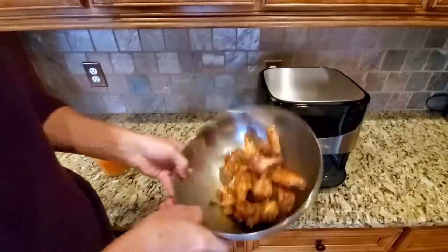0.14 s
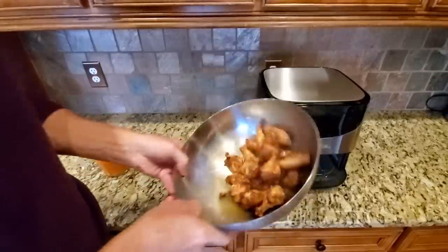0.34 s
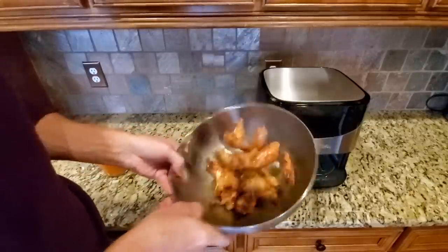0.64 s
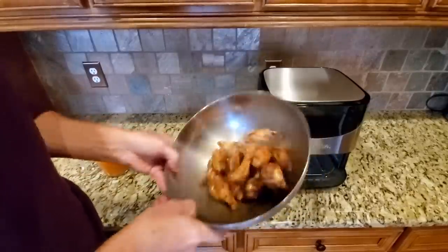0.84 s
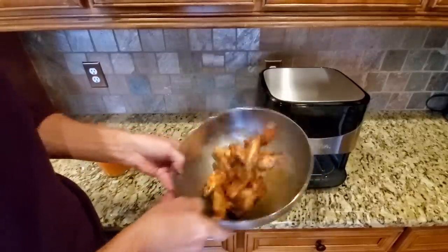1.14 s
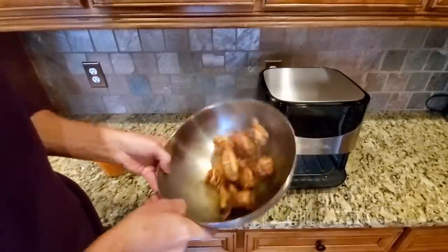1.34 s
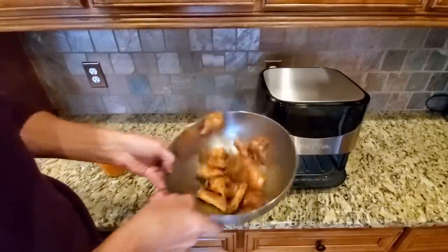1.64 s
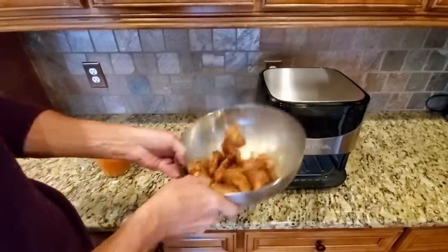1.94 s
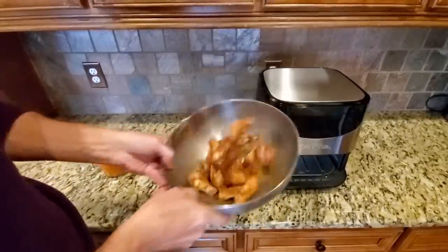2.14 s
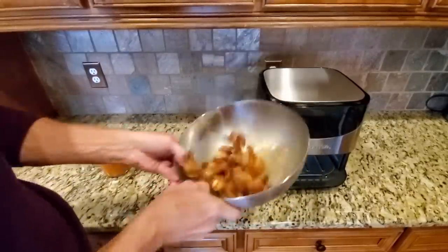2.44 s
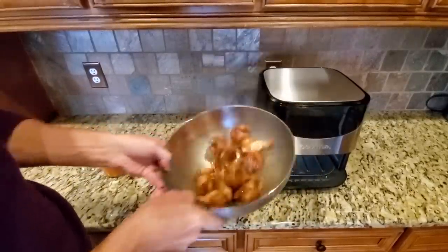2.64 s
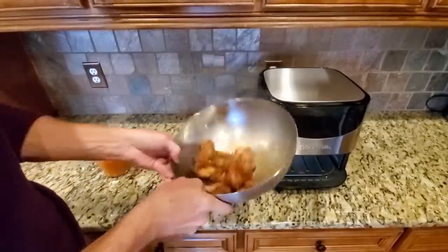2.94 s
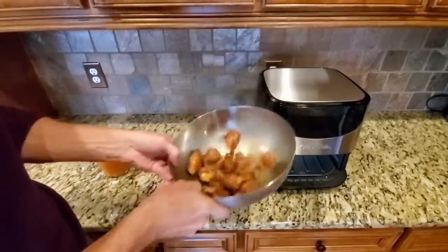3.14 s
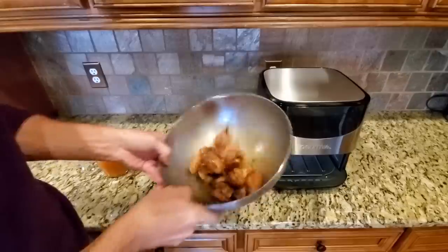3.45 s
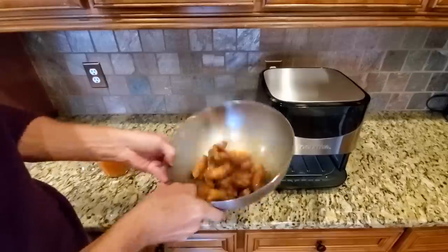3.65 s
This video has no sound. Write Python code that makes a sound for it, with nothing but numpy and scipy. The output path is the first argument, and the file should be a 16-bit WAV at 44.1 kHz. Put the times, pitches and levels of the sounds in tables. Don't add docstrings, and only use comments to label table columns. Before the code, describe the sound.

Crisp chicken wings tossed in a hand-held steel bowl, landing about four times a second with hollow thuds, crusty clicks and a fine rattle; small tiled kitchen, faint appliance hum, close stereo microphone.

```python
import sys
import numpy as np
from scipy import signal
from scipy.fft import rfft, irfft, next_fast_len
from scipy.io import wavfile
from scipy.ndimage import uniform_filter1d, map_coordinates

SR = 44100
rng = np.random.default_rng(int(sys.argv[2]) if len(sys.argv) > 2 else 0)


def volts_from_decibels(level):
    exponent = np.asarray(level, float) / 20
    return 10 ** exponent


def master_out(mix):
    frames = np.transpose(np.atleast_2d(mix))
    ceiling = np.clip(frames, -1, 1)
    pcm = np.round(ceiling * 32767).astype(np.int16)
    wavfile.write(sys.argv[1], SR, pcm)


N = 167580


def unit(x):
    return x / np.sqrt(np.mean(x ** 2) + 1e-20)


def along(points, hz):
    f, value = np.transpose(points)
    return np.interp(np.log(hz + 1), np.log(f + 1), value)


def filtered(x, response):
    m = next_fast_len(N + SR // 2)
    return irfft(rfft(x, m) * response(np.fft.rfftfreq(m, 1 / SR)), m)[..., :N]


def causal(x, spectrum):
    level_db = np.maximum(along(spectrum, np.fft.rfftfreq(4096, 1 / SR)), -60)
    cepstrum = irfft(np.log(volts_from_decibels(level_db)))
    cepstrum[1:2048] *= 2
    cepstrum[2049:] = 0
    h = irfft(np.exp(rfft(cepstrum)))
    return signal.fftconvolve(x, h[None] / np.linalg.norm(h), axes=1)[:, :N]


def add(track, s, sound):
    i = max(round(s * SR), 0)
    track[..., i:i + sound.shape[-1]] += sound


def pair(count, alike):
    a, b = rng.standard_normal((2, count))
    half_angle = np.arccos(np.clip(alike, -1, 1)) / 2
    common, opposed = np.cos(half_angle) * a, np.sin(half_angle) * b
    return np.array([common + opposed, common - opposed])


# frequency in Hz, level in dB rms.
HUM_LINES = [(120, -53.5), (181, -71), (240, -56)]
# frequency in Hz, level in dB.
AIR_SPECTRUM = [(25, -9.5), (120, -3), (330, -16.5), (520, -10.5), (900, -18), (4000, -29), (5900, -21.5),
                (9000, -32.5)]
AIR_DB = -47.5


def hum():
    t = np.arange(N) / SR
    knots = rng.standard_normal((len(HUM_LINES), 40))
    line_index = np.arange(len(HUM_LINES))[:, None]
    sway = map_coordinates(knots, [*np.broadcast_arrays(line_index, t * 8)])
    lines = np.zeros(N)
    for (hz, db), w in zip(HUM_LINES, sway):
        lines += np.sqrt(2) * volts_from_decibels(db + 1.1 * w) * np.sin(2 * np.pi * hz * t + 0.45 * w)

    def apart(hz):
        return np.clip(hz / 1500, .2, .9)

    common, own = rng.standard_normal(N), rng.standard_normal((2, N))
    shared_air = filtered(common, lambda hz: volts_from_decibels(along(AIR_SPECTRUM, hz)) * np.sqrt(1 - apart(hz) ** 2))
    own_air = filtered(own, lambda hz: volts_from_decibels(along(AIR_SPECTRUM, hz)) * apart(hz))
    return lines + volts_from_decibels(AIR_DB) * unit(shared_air + own_air)


# frequency in Hz, t60 in seconds.
ROOM_DECAY = [(200, 0.34), (6000, 0.28), (14000, 0.17)]
ROOM_DB, WALL_S = -8, 0.0046


def kitchen(x):
    hz, t, z = signal.stft(rng.standard_normal((2, SR // 2)), SR, nperseg=256)
    z[1] = np.where(hz[:, None] < 450, z[0], z[1])
    decay = volts_from_decibels(-60 * t / along(ROOM_DECAY, hz)[:, None])
    tail = signal.istft(z * decay, SR, nperseg=256)[1]
    delayed = np.pad(x, (round(WALL_S * SR), 0))
    return signal.fftconvolve(delayed[None], tail / np.linalg.norm(tail[0]), axes=1)[:, :N]


# start in seconds, rattle level in dB.
TOSSES = [(0, -39.5), (.066, -47.5), (.276, -33), (0.532, -34), (0.763, -29.5), (1.012, -35.5),
          (1.248, -36), (1.479, -35), (1.737, -32.5), (1.977, -30.5), (2.256, -33.5), (2.469, -34.5),
          (2.716, -34.5), (2.955, -32.5), (3.191, -31.5), (3.439, -31.5), (3.662, -33.5)]
# frequency in Hz, level in dB.
CRUST_SPECTRUM = [(1800, -21), (3500, -21.5), (5000, -12), (5750, 1.5), (7200, -3), (8300, -16),
                  (12300, -15.5), (15800, -18)]
# frequency in Hz, level in dB.
RATTLE_SPECTRUM = [(100, -4), (340, -5.5), (480, 8.5), (780, -5), (1050, -3.5), (1500, -7), (2030, -4),
                   (4500, -26)]
RISE_S, FALL_T60_S, CRUMBS_PER_S = 0.015, 0.4, 1700
CRUMB_SPREAD_DB, BUMP_SPREAD_DB, RATTLE_DB = 2, 0.9, 5
CRUST_ALIKE = 0.39


def heap():
    t = np.arange(N) / SR
    swell = np.zeros(N)
    for s, db in TOSSES:
        since = np.clip(t - s, 0, 1)
        swell += volts_from_decibels(db - 60 * since / FALL_T60_S) * (1 - np.exp(-since / RISE_S))
    dice = rng.random((2, N))
    sizes = volts_from_decibels(np.array([[CRUMB_SPREAD_DB], [BUMP_SPREAD_DB]]) * rng.exponential(size=(2, N)))
    chance = np.array([[1], [.7]]) * CRUMBS_PER_S / SR
    impacts = (dice < chance) * sizes
    grains = signal.lfilter([1], [1, -np.exp(-1 / (0.0019 * SR))], impacts)
    crumbs = causal(unit(grains[0] * pair(N, CRUST_ALIKE)) * swell, CRUST_SPECTRUM)
    bumps = causal(unit(grains[1:] * rng.standard_normal(N)) * swell, RATTLE_SPECTRUM)[0]
    return crumbs, volts_from_decibels(RATTLE_DB) * bumps


# start in seconds, frequency in Hz, peak in dB, t60 in seconds.
RIM_KNOCKS = [(0.484, 1840, -33, 0.041), (0.83, 2020, -14, 0.024), (0.982, 1880, -30.5, 0.029),
              (2.82, 1880, -36, 0.23), (2.961, 1050, -19, 0.21), (2.785, 1950, -25.5, .04),
              (.537, 2800, -24.5, 0.023), (0.85, 1050, -19, 0.025), (3.189, 2370, -32.5, .02),
              (3.457, 1540, -20, .05), (3.458, 1060, -26.5, 0.29), (3.456, 2040, -28.5, 0.29),
              (3.206, 930, -25, 0.074), (3.4547, 1092, -4.5, 0.028), (3.4547, 2040, -9, 0.048)]


def rings():
    out, t = np.zeros(N + SR), np.arange(SR // 3) / SR
    for s, hz, db, t60 in RIM_KNOCKS:
        envelope = volts_from_decibels(db - 60 * t / t60) * (1 - np.exp(-t / 0.00018))
        add(out, s, envelope * np.sin(2 * np.pi * hz * t * (1 + 0.089 * t)))
    return out[:N]


# start in seconds, peak in dB.
CLICKS = [(0.0226, -20.5), (0.068, -22), (0.0773, -11), (0.2791, -16), (0.311, -23.5), (0.36, -20.5),
          (0.3977, -22.5), (0.4047, -21.5), (0.546, -16), (0.6512, -26.5), (0.6861, -16.5),
          (0.7844, -6), (0.82, -13), (0.892, -23), (1.029, -24.5), (1.0373, -17.5), (1.0604, -13),
          (1.091, -23), (1.1441, -19), (1.2605, -13), (1.284, -14), (1.3953, -15), (1.497, -22),
          (1.516, -14.5), (1.559, -18.5), (1.777, -18), (1.834, -9.5), (1.953, -21), (2.0066, -15.5),
          (2.1048, -25),
          (2.2928, -15.5), (2.3227, -18), (2.4813, -19.5), (2.5317, -22), (2.541, -18),
               (2.5996, -18.5), (2.7192, -15.5), (2.7569, -18), (2.798, -10.5), (2.8252, -20),
               (2.93, -18.5), (2.959, -14.5), (2.9948, -19), (3.0195, -13.5), (3.0339, -13), (3.199, -17.5),
               (3.2286, -16), (3.4553, -20), (3.4725, -16), (3.4925, -21), (3.5088, -25), (3.5647, -13.5),
               (3.6777, -14.5), (3.693, -11), (3.7166, -12), (3.7605, -14.5),
          (0.355, -20.5), (.253, -33), (.285, -20), (.526, -32), (0.538, -30.5), (1.354, -27.5),
                  (1.488, -32), (1.701, -32), (1.737, -28.5), (2.1, -26), (2.234, -33), (2.282, -25),
                  (2.47, -25.5), (3.186, -31), (3.415, -28), (3.55, -29), (3.406, -32.5)]
SNAP_T60_S, FIZZ_T60_S, FIZZ_DB, CLICK_DB = 0.019, 0.1, -6, -7.5
TILT_SPREAD = 0.38


def clicks():
    out, t = np.zeros((2, N + SR)), np.arange(SR // 6) / SR
    for s, db in CLICKS:
        grain_db = 4 * unit(uniform_filter1d(rng.standard_normal(len(t)), size=90))
        snap = volts_from_decibels(-60 * t / SNAP_T60_S)
        fizz = volts_from_decibels(FIZZ_DB + grain_db - 60 * t / FIZZ_T60_S)
        tilt = np.clip(TILT_SPREAD * rng.standard_normal(), -.9, .9)
        pan_db = rng.normal(0, 1.8)
        noise = unit(signal.lfilter([1, tilt], [1], pair(len(t), CRUST_ALIKE)))
        level = volts_from_decibels(db + CLICK_DB + pan_db * np.array([[1], [-1]]))
        add(out, s, level * (snap + fizz) * noise)
    return causal(out[:, :N], CRUST_SPECTRUM)


# start in seconds, peak in dB,
# hardness in dB.
THUDS = [(0.022, -25.5, -10), (0.068, -21.5, -10), (0.075, -20, -11), (0.089, -23, 1.5),
         (0.252, -23, -12), (0.278, -16.5, -4), (0.31, -21, 0), (0.33, -27, -4.5),
         (0.353, -11.5, -16), (0.363, -13, -15), (0.371, -26.5, -21), (0.405, -22.5, -7.5),
         (0.536, -19.5, 0.5), (0.579, -27, 3), (0.643, -21.5, -15.5), (0.785, -25.5, 7),
         (0.818, -13.5, -9), (1.03, -24, -6), (1.043, -22, 0), (1.054, -14.5, -13), (1.143, -21, -4),
         (1.26, -25.5, -10), (1.346, -25.5, -5.5), (1.395, -19.5, -5), (1.495, -22, -5),
         (1.532, -19, -5.5), (1.577, -19, -8), (1.744, -15.5, -26),
         (1.777, -20.5, 5), (1.834, -23.5, -30), (1.943, -21, -23), (2.007, -18.5, -5.5),
              (2.043, -17, -4.5), (2.292, -17, -1.5), (2.494, -17.5, -26), (2.533, -20.5, -6),
              (2.559, -25, -3), (2.754, -16.5, -19), (2.768, -17, -7.5), (2.785, -24, -3),
              (2.794, -23, 3.5), (2.824, -22.5, -3.5), (3.0, -19.5, -3), (3.032, -10, -14.5),
              (3.062, -27, -10), (3.207, -23.5, -1.5), (3.233, -18, 2.5), (3.455, -25, -3), (3.462, -26, 3),
              (3.472, -12.5, -4), (3.489, -22, -1), (3.565, -28.5, 7.5), (3.677, -17.5, -9),
              (3.702, -17, -1), (3.76, -17.5, -12),
         (.685, -25, -3.5), (.779, -21.5, -3.5), (.053, -30, -6), (.398, -25.5, -5.5),
                (0.449, -38, -10), (.501, -30.5, -8), (.892, -26, -3.5), (.938, -30, -20), (1.011, -32, -3),
                (1.291, -27, 3), (1.386, -25, -27), (1.919, -36, -7.5), (1.978, -28, -19), (2.253, -32, -9),
                (2.364, -30, -4.5), (2.7, -30, -12), (3.187, -29.5, -5), (3.641, -28.5, -9),
                (1.709, -22.5, -17), (2.717, -29, -6), (2.929, -24.5, -8), (3.406, -26.5, -10.5)]
# frequency in Hz, level in dB, t60 in seconds.
STEEL_MODES = [(930, -36, 0.066), (1046, 2.5, 0.036), (1163, -6, 0.027), (1591, -8.5, 0.052),
               (1877, -4, 0.068), (2034, -7, 0.028)]
# frequency in Hz, width in Hz, level in dB.
CAVITY_MODES = [(190, 600, -16), (460, 80, -6), (478, 26.5, -1), (580, 110, -11.5)]
# time in seconds, frequency in Hz.
HOLLOW_PITCH = [(0, 480), (.28, 460), (.4, 430), (.56, 487), (.78, 440), (.83, 482), (1.4, 478), (1.5, 440),
                (1.58, 440), (1.74, 482), (2.04, 494), (2.5, 486), (2.56, 435), (2.72, 480), (3.03, 484),
                (3.23, 445), (3.45, 480), (3.7, 484)]
HOLLOW_STEPS = np.arange(420, 521, 20) / 470
CAVITY_SPREAD = 0.02
PUSH_S, THUD_DB, STEEL_DB, SLAP_DB, SLAP_T60_S = 0.00025, 23, -8, 13, 0.03


def thuds():
    pushes, steel = np.zeros((len(HOLLOW_STEPS), N + SR)), np.zeros(N + SR)
    t = np.arange(SR // 5) / SR
    for s, db, hard_db in THUDS:
        chance = rng.standard_normal((len(STEEL_MODES) + 1, 2))
        u = t / (PUSH_S * volts_from_decibels(2 * chance[-1, 0]))
        pitch = np.interp(s, *np.transpose(HOLLOW_PITCH)) / 470 + CAVITY_SPREAD * chance[-1, 1]
        nearest = np.argmin(abs(HOLLOW_STEPS - pitch))
        add(pushes[nearest], s, -volts_from_decibels(db + THUD_DB) * u * np.exp(-u))

        ring = np.zeros(len(t))
        for (hz, level, t60), (a, b) in zip(STEEL_MODES, chance):
            ring += volts_from_decibels(level + 2.3 * a - 60 * t / t60) * np.sin(2 * np.pi * hz * (1 + 0.047 * b) * t)
        dull_noise = uniform_filter1d(uniform_filter1d(rng.standard_normal(len(t)), size=7), size=6)
        slap = dull_noise * volts_from_decibels(SLAP_DB - 60 * t / SLAP_T60_S)
        add(steel, s, volts_from_decibels(db + hard_db + STEEL_DB) * (ring + slap))

    def air(f):
        total = 0
        for hz, width, db in CAVITY_MODES:
            center = hz * HOLLOW_STEPS[:, None]
            mode = 1j * f * width / (center ** 2 - f * f + 1j * f * width)
            total = total + np.sign(hz - 300) * volts_from_decibels(db) * mode
        return total

    return filtered(pushes, air).sum(axis=0) + steel[:N]


# frequency in Hz, lead in radians.
PORT_LEADS = [(400, 0), (540, -1.3), (900, -.7), (2500, -.9)]
# frequency in Hz, difference in dB.
PORT_LEVELS = [(60, 2), (1200, 3.5), (3800, 0)]
CRUST_LEFT_DB, CRUST_TURN = -2.5, 1.53
HELD_BELOW_HZ = 34


def scene():
    crumbs, bumps = heap()
    bowl, crust = thuds() + rings() + bumps, clicks() + crumbs
    side = np.array([[.5], [-.5]])

    def bowl_to_ports(hz):
        held = (1j * hz / (HELD_BELOW_HZ + 1j * hz)) ** 2
        return held * volts_from_decibels(side * along(PORT_LEVELS, hz)) * np.exp(1j * side * along(PORT_LEADS, hz))

    def crust_to_ports(hz):
        return volts_from_decibels(side * CRUST_LEFT_DB) * np.exp(1j * side * CRUST_TURN) * np.ones_like(hz)

    direct = filtered(bowl, bowl_to_ports) + filtered(crust, crust_to_ports)
    return direct + volts_from_decibels(ROOM_DB) * kitchen(bowl + crust[0]) + hum()


def top_cut(x):
    return signal.sosfilt(signal.butter(12, 16970, fs=SR, output="sos"), x)


TOP_HZ, EDGE_HZ, ABOVE_EDGE_DB = 16900, 15900, -30


def record(dry):
    def band(hz):
        return (hz < TOP_HZ) * volts_from_decibels(ABOVE_EDGE_DB * (hz > EDGE_HZ))

    return top_cut(filtered(dry, band))


dry = scene()
out = record(dry)
master_out(out)
```